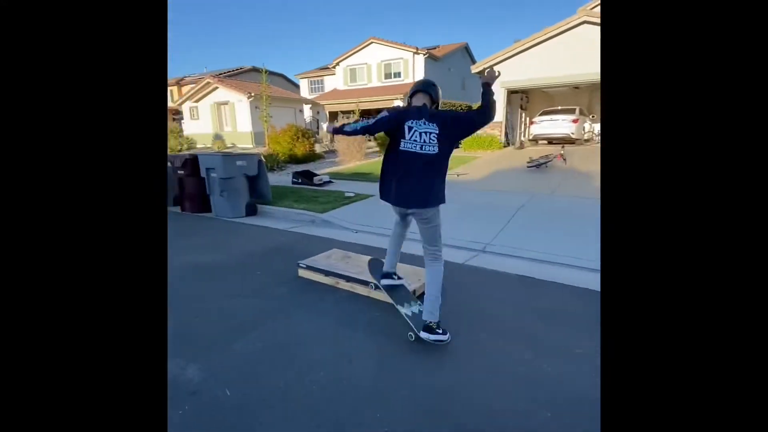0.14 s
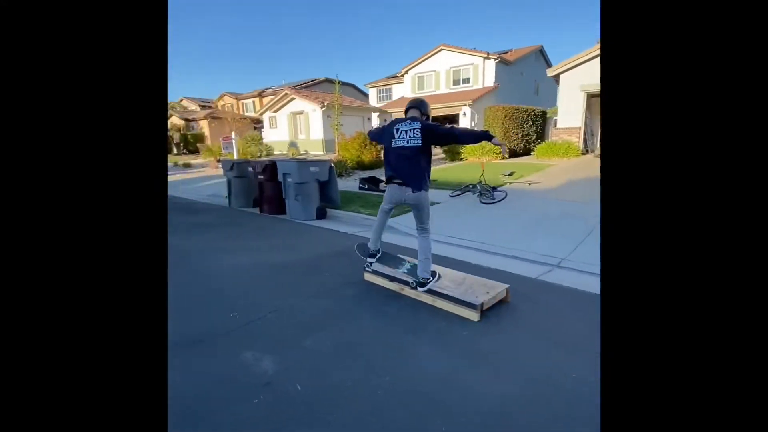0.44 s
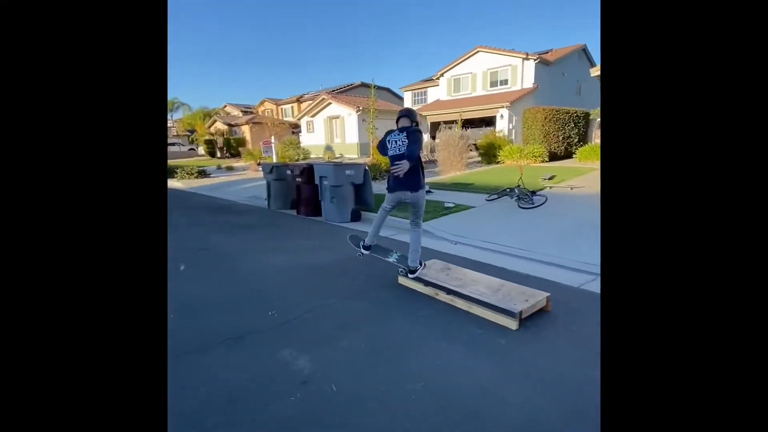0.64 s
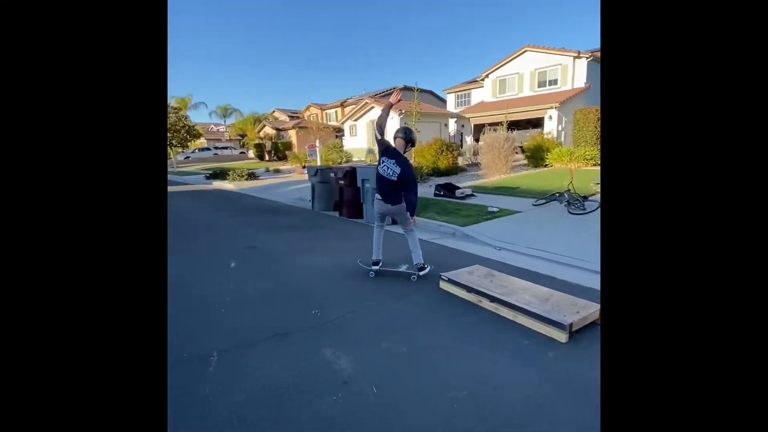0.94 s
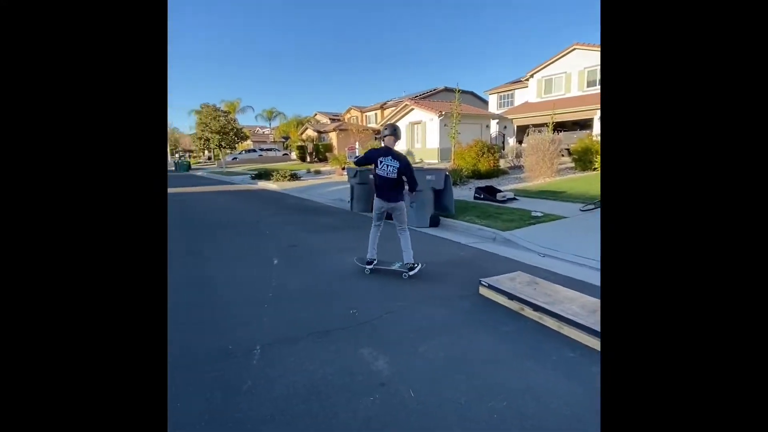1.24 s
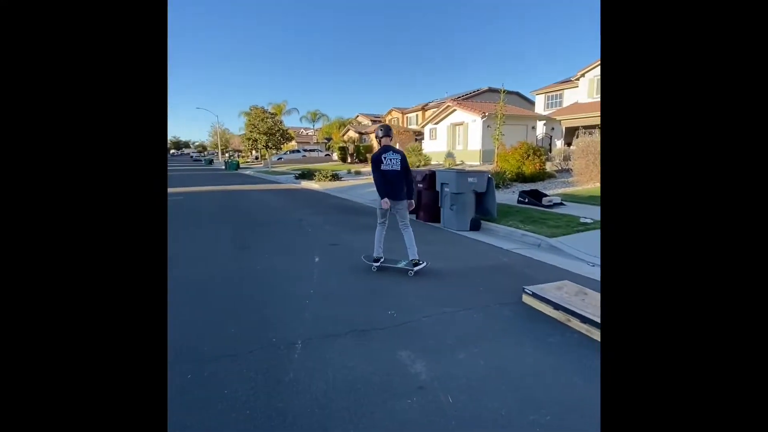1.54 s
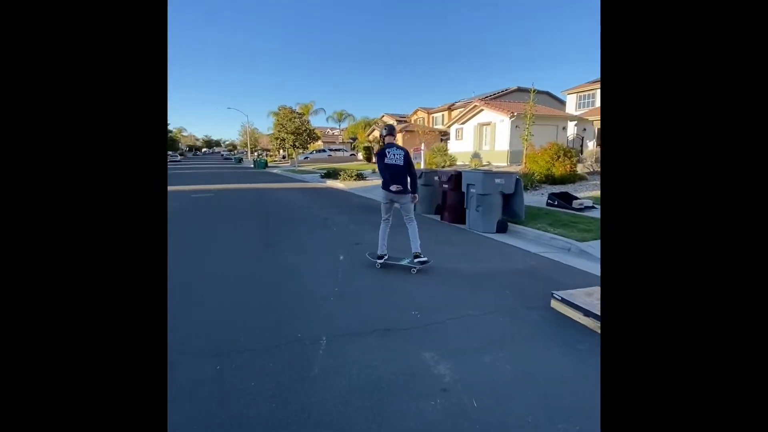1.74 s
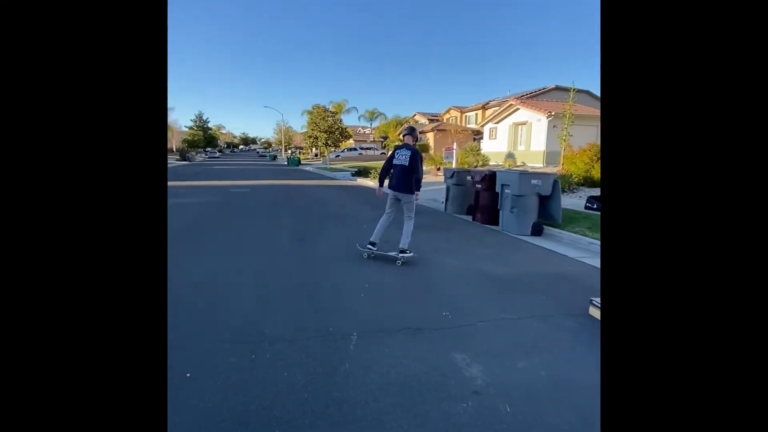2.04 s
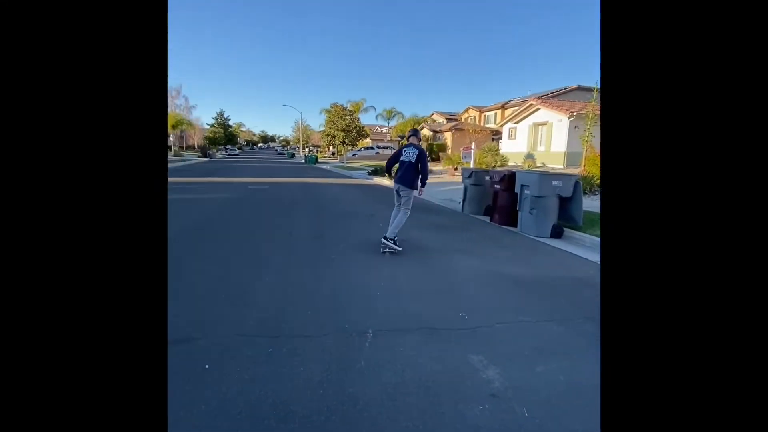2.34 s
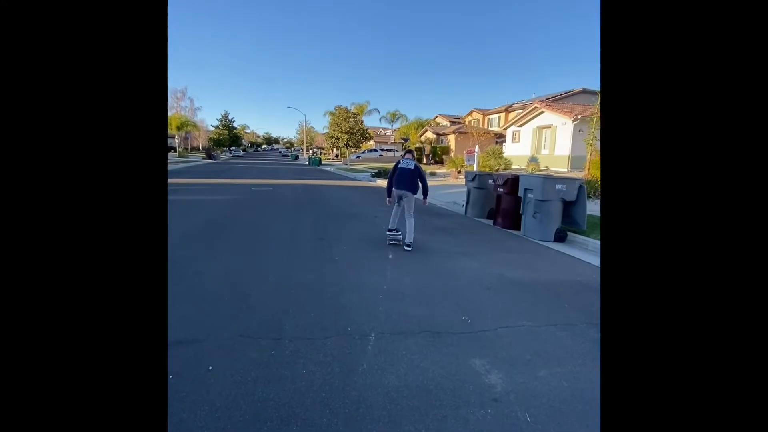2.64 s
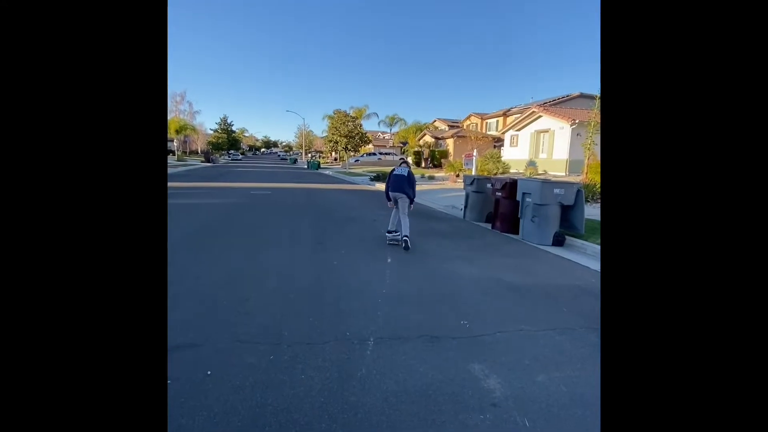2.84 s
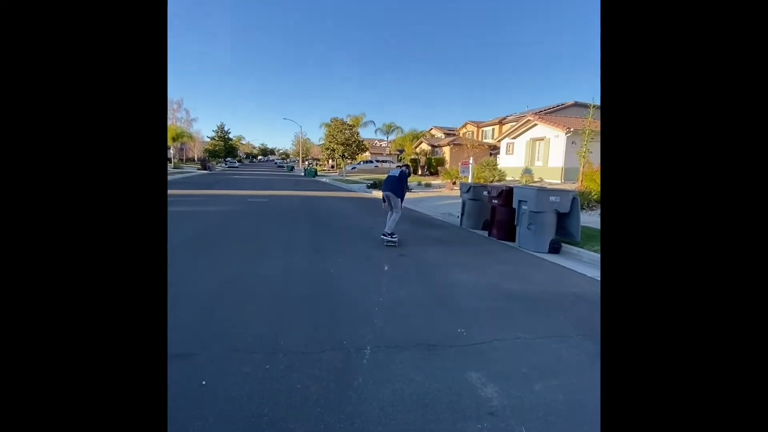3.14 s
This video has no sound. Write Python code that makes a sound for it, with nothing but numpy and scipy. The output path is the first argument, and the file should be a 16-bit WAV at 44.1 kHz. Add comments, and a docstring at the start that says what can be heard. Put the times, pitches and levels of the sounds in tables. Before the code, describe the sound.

Skateboard wheels rumble across hollow wood with sharp cracks, then roll along a gritty street.

```python
"""Skateboard over a wooden box

A skateboarder pops onto a low wooden box, rolls across it, clatters off and rides away down an
asphalt street. The wheels rumble, roar and crunch over grit; the deck cracks at each blow and the
hollow box booms. Houses return faint echoes; a small two-port microphone follows from behind."""
import sys
import numpy as np
from scipy import signal
from scipy.fft import rfft, irfft
from scipy.io import wavfile

SR = 44100
rng = np.random.default_rng(int(sys.argv[2]) if len(sys.argv) > 2 else 0)


def pcm_store(signal):
    """Save signal as 16-bit PCM."""
    levels = np.round(np.clip(np.atleast_2d(signal), -1, 1) * 32767)
    wavfile.write(sys.argv[1], SR, levels.astype(np.int16).T)


N = 145530
TIME, HZ = np.arange(N) / SR, np.fft.rfftfreq(N, 1 / SR)
ATTACK_S = 0.00046


def amp(db):
    """Decibels to gain."""
    return 10 ** (np.asarray(db) / 20)


def unit(x):
    """Scales to rms 1."""
    return x / np.sqrt(np.mean(x ** 2) + 1e-20)


def eq_curve(points):
    """Joins EQ points into a gain at every frequency."""
    f, db = np.transpose(points)
    return amp(np.interp(np.log(HZ + 1), np.log(f), db))


def colour(x, gain):
    """Minimum-phase EQ of the given shape; keeps the power of white noise."""
    log_gain = np.log(np.maximum(unit(gain), 1e-4))
    mirrored = np.concatenate([log_gain, log_gain[-2:0:-1]])
    response = np.exp(np.conj(signal.hilbert(mirrored))[:len(HZ)])
    impulse = irfft(response)[:4096]
    return irfft(rfft(x, 2 * N) * rfft(impulse, 2 * N))[..., :N]


def bands(points, bass_hz=552, treble_hz=2170, top_hz=7400):
    """Crossover: splits an EQ curve into bass, mids, treble and top octave."""
    low = 1 / (1 + (HZ / bass_hz) ** 8)
    high = 1 / (1 + (treble_hz / (HZ + 1)) ** 8)
    top = 1 / (1 + (top_hz / (HZ + 1)) ** 16)
    return eq_curve(points) * np.sqrt([low, (1 - low) * (1 - high), high * (1 - top), top])


def strike(start, rise_s, decay_s):
    """Envelope of one hit: the contact builds smoothly, then dies."""
    t = TIME - start
    attack = np.logaddexp(0, 2 - 2 * t / rise_s)
    return np.exp(-np.minimum(attack + np.maximum(t, 0) / decay_s, 20))


def ring(modes, t60_s):
    """Struck modes in random phase; the lowest dies in t60_s, higher ones sooner."""
    t = TIME[:SR // 3]
    hz, db = np.transpose(modes)[:, :, None]
    envelopes = amp(db - 60 * t / t60_s * np.sqrt(hz / hz[0]))
    waves = envelopes * np.sin(2 * np.pi * (hz * t + rng.random(hz.shape)))
    return waves.sum(0) / np.linalg.norm(amp(db)) * (1 - np.exp(-t / ATTACK_S))


def add(mix, s, sound):
    """Mixes a sound in at s seconds."""
    part = mix[max(round(s * SR), 0):][:len(sound)]
    part += sound[:len(part)]


# tone of the outdoor air: f/Hz, level/dB
AIR_EQ = [(20, -18), (55, 0), (115, 0), (200, -12), (600, -20), (2000, -28), (6000, -42), (16000, -54)]


def air(level_db=-50.5):
    """A bed of outdoor air: soft, bass-heavy noise."""
    return amp(level_db) * colour(rng.standard_normal((2, N)), eq_curve(AIR_EQ))


def street_echoes(x, near_t60_s=0.11, near_db=-11, far_t60_s=0.49, far_db=-31):
    """Adds quick scatter from ground and box, and a faint, darker tail from the houses."""
    t = TIME[:SR]
    near, far = rng.standard_normal((2, 2, SR))
    near = unit(near * amp(-60 * t / near_t60_s) * (t > .006))
    far = unit(signal.lfilter([1], [1, -.6], far) * amp(-60 * t / far_t60_s) * (t > .04))
    reverb = (amp(near_db) * near + amp(far_db) * far) / np.sqrt(SR)
    return x + signal.fftconvolve(x, reverb, axes=1)[:, :N]


# stereo image of the ports: f/Hz, left phase lead/rad, left over right/dB, likeness/0-1
PORT_IMAGE = [(40, -.1, 1, .66), (120, -.4, -5, .85), (260, -.2, -13, .87), (350, -.5, -17, .6),
              (450, -1.6, -15, .5), (530, -2.3, -10, .7), (680, -3.1, -2, .92), (980, -4.8, -6, .95),
              (1400, -5.5, -2, .95), (2100, -5.6, 1, .88), (2600, -5.7, -3, .5), (3600, -6.5, -1, .78),
              (4400, -6.8, -3, .55), (4800, -10, -2, .65), (5400, -12.2, 1, .74), (6200, -11.4, 1, .7),
              (6900, -9.6, 0, .88), (7800, -9.4, 0, .95), (8500, -8.8, -1, .75), (9800, -6.4, 0, .9),
              (11400, -6, 0, .85), (12700, -3.3, 0, .93), (14400, -3, 0, .9), (15700, 0, 0, .73)]


def microphone(x):
    """Two ports share one part of the sound, each with its own phase and level."""
    f, *columns = np.transpose(PORT_IMAGE)
    phase, balance_db, likeness = (np.interp(HZ, f, c) for c in columns)
    likeness, balance = np.clip(likeness, 0, .99), amp(balance_db)
    shared, separate = rfft(x)
    right = (likeness * shared + np.sqrt(1 - likeness ** 2) * separate) * np.exp(-1j * phase)
    return irfft(np.array([balance * shared, right]) * np.sqrt(2 / (1 + balance ** 2)))


# fader for the coarse asphalt: t/s, level/dB
CRUNCH_FADER = [(1.5, -66), (1.74, -59), (1.85, -49), (2.05, -51), (2.2, -69), (2.5, -68)]
# tone of its grains: f/Hz, level/dB
CRUNCH_EQ = [(400, -25), (700, 4), (1500, -8), (2300, -9), (3000, 3), (3700, -6), (5000, -22), (16000, -38)]


def crunch(grains_per_s=1200):
    """The wheels cross a coarse stretch of road: a dense run of hard grains."""
    grains = (rng.random(N) < grains_per_s / SR) * rng.standard_normal((2, N))
    fader = amp(np.interp(TIME, *np.transpose(CRUNCH_FADER)))
    return colour(unit(grains), eq_curve(CRUNCH_EQ)) * fader


# pebbles under the wheels: t/s, knock/dB, tick/dB
PEBBLE_CUES = [(0.092, -30, -30.5), (.133, -40, -35), (0.171, -39, -39), (0.265, -34, -35),
               (0.488, -32, -19), (0.624, -30, -22), (0.74, -49, -42), (.782, -43, -45), (0.831, -38, -40),
               (1.083, -31, -44), (1.128, -29, -46), (1.302, -46, -57), (1.392, -44, -43), (1.41, -38, -43),
               (1.4648, -33, -39), (1.5146, -32.5, -33), (1.619, -33, -30), (1.797, -27, -33),
               (1.891, -35, -31), (1.9968, -29, -37.5), (2.038, -26.5, -34), (2.2431, -35, -35),
               (2.3702, -29, -28), (2.4472, -32, -46), (2.4779, -29.5, -28), (2.694, -46, -52),
               (2.7405, -37, -51), (2.7915, -57, -50)]
# tone of a pebble: f/Hz, level/dB
PEBBLE_EQ = [(100, -46), (600, -19.5), (1000, 6.5), (1800, 7.5), (2700, -3.5), (4200, -11), (6000, -1),
             (10000, -7), (16000, -12)]


def pebbles(knock_decay_s=0.0028, tick_decay_s=0.0012):
    """Loose stones knock under the wheels and crack with a bright tick."""
    bass, mids, treble, top = bands(PEBBLE_EQ)
    knock, tick = np.zeros((2, N))
    t = TIME[:SR // 20]
    for s, knock_db, tick_db in PEBBLE_CUES:
        add(knock, s, amp(knock_db) * np.exp(-t / knock_decay_s))
        add(tick, s, amp(tick_db) * np.exp(-t / tick_decay_s))
    noise = rng.choice([-1., 1.], (2, N))
    return colour(knock * noise, np.hypot(bass, mids)) + colour(tick * noise, np.hypot(treble, top))


# modes of the box: f/Hz, level/dB
BOX_MODES = [(156, -0.5), (249, -0.5), (335, -15), (396, -5.5), (462, -1)]


def box_boom():
    """The hollow box answers a hit with a short, low boom."""
    return ring(BOX_MODES, t60_s=0.14)


# modes of deck and trucks: f/Hz, level/dB
DECK_MODES = [(855, -3.5), (975, -4.5), (1127, 7), (1247, -1), (1340, -11.5), (1477, -20), (1625, 1),
              (1765, 3.5), (2065, -8), (2320, 4), (3500, -6), (4750, -20), (5840, -14)]


def deck_ring():
    """Deck and trucks ring briefly when jolted."""
    return ring(DECK_MODES, t60_s=0.16)


# grit's share of the power: rumble, roar, hiss, fizz, each /0-1
BAND_GRIT = [.15, .25, .35, .65]
# judder depth: rumble/dB, roar/dB, hiss/dB, fizz/dB
BAND_JUDDER = [1.4, 3.4, 3.1, 3.3]


def rolling(faders, eq, judder_hz, grit_per_s=1500, grit_spread_db=5, deck_db=-14.5):
    """Wheels hit countless grains of the surface, judder over its bumps and shake the deck."""
    times, *band_levels = np.transpose(faders)
    judder = unit(irfft(rfft(rng.standard_normal(N)) * (HZ > 6) / (1 + (HZ / judder_hz) ** 2)))
    hits = rng.random(N) < grit_per_s / SR
    strength = amp(grit_spread_db * np.minimum(rng.exponential(1, N), 4))
    grit = unit(hits * strength * rng.choice([-1., 1.], (2, N)))
    layers = []
    for gain, db, share, judder_db in zip(bands(eq), band_levels, BAND_GRIT, BAND_JUDDER):
        texture = np.sqrt(share) * grit + np.sqrt(1 - share) * rng.standard_normal((2, N))
        flutter = unit(amp(judder_db * judder))
        layers.append(colour(texture, gain) * flutter * amp(np.interp(TIME, times, db)))
    roar = layers[1]
    deck = signal.fftconvolve(roar, deck_ring()[None], axes=1)[:, :N]
    return sum(layers) + amp(deck_db) * roar.std() * unit(deck)


# faders for wheels on asphalt: t/s, rumble/dB, roar/dB, hiss/dB, fizz/dB
ROAD_FADERS = [(0, -30.5, -18.5, -33.5, -36), (0.035, -43, -40.5, -49, -50), (0.11, -48.5, -43, -51.5, -52),
               (0.18, -54, -47, -58, -67), (0.22, -39, -49, -58, -62), (0.66, -60, -54, -54.5, -57),
               (0.7, -47, -38.5, -41, -42), (0.76, -46, -43, -60, -62.5), (0.97, -42.5, -43, -54, -54),
               (1.12, -51, -43.5, -55, -75), (1.28, -50, -51, -65, -88), (1.45, -50, -50.5, -66, -79),
               (1.49, -48.5, -41.5, -56, -60), (1.62, -48.5, -39, -52.5, -48),
               (1.72, -40.5, -42, -59.5, -56), (1.83, -37, -37, -53.5, -46), (2.02, -40.5, -40, -52, -49),
               (2.16, -48, -40.5, -55, -61), (2.27, -42, -36.5, -44.5, -45.5),
               (2.38, -49, -38.5, -44, -49.5), (2.49, -47, -38.5, -49.5, -53), (2.58, -51.5, -49, -58, -67),
               (2.87, -46, -47, -62, -75), (3.0, -39, -38.5, -49, -54), (3.08, -38.5, -41.5, -51, -62),
               (3.15, -36, -32.5, -44.5, -53), (3.25, -48, -47.5, -72, -83), (3.3, -44, -53, -58, -72)]
# tone of the asphalt: f/Hz, level/dB
ROAD_EQ = [(20, 0), (40, -45), (60, -5.5), (130, 0), (330, -3.5), (600, -11.5), (800, -2), (1200, -11),
           (1500, -10.5), (1950, -9.5), (2400, -21), (3300, -14.5), (4200, -20), (5200, -13), (6200, -17.5),
           (7500, -21.5), (10000, -31), (13000, -45), (16000, -39.5)]


def wheels_on_road():
    """Asphalt gives a gritty roll before and after the box."""
    return rolling(ROAD_FADERS, ROAD_EQ, judder_hz=44)


# faders for wheels on the box top: t/s, rumble/dB, roar/dB, hiss/dB, fizz/dB
BOX_TOP_FADERS = [(.19, -66, -70, -80, -80), (.22, -23, -25, -29, -48), (.31, -35, -39, -50.5, -61),
                  (.39, -28, -30, -41, -55.5), (.455, -28.5, -31, -38.5, -53),
                  (.48, -32.5, -24.5, -27, -33), (.535, -20, -36, -42, -49), (.595, -32.5, -43, -46, -55),
                  (.62, -31.5, -32, -35.5, -35), (.665, -30, -35, -33, -38), (.7, -66, -62, -70, -54)]
# tone of the box top: f/Hz, level/dB
BOX_TOP_EQ = [(30, -15.5), (90, -2), (170, 0.5), (400, 0), (600, -12), (800, -1), (1000, -4.5), (1350, -14),
              (1600, -6.5), (2400, -28.5), (4200, -37.5), (5400, -30.5), (8000, -53.5), (15000, -62)]


def wheels_on_box():
    """The wooden top gives a louder, darker roll from about 0.2 to 0.68 s."""
    return rolling(BOX_TOP_FADERS, BOX_TOP_EQ, judder_hz=60)


# low thuds of the wood: t/s, f/Hz, level/dB
THUD_CUES = [(0.201, 229, -9.5), (0.224, 163, -13), (.27, 140, -19), (0.379, 180, -21), (0.481, 280, -11.5),
             (0.496, 150, -13), (.53, 247, -19), (.627, 332, -18.5), (0.676, 320, -28)]


def thuds(rise_s=0.0019, decay_s=.014):
    """The rider's weight flexes deck and box for a few slow cycles."""
    wave = sum(amp(db) * strike(s, rise_s, decay_s) * np.exp(2j * np.pi * hz * (TIME - s))
               for s, hz, db in THUD_CUES)
    return np.array([wave.imag, wave.real])


# blows of the board: t/s, thump/dB, crack/dB, snap/dB, spit/dB, burst decay/s,
# knock f/Hz, knock/dB, deck ring/dB, box boom/dB
BLOW_CUES = [(0.1922, -48, -17.5, -20, -40, 0.0099, 1250, -36, -34, -53),
             (.2, -18.5, -12.5, -14.5, -19.5, 0.0069, 1010, -3.5, -13, -26),
             (0.221, -26, -20, -28, -48, 0.0065, 1400, -16, -28, -32),
             (0.472, -21, -26, -28, -33, 0.0081, 1530, -17, -36, -32),
             (.478, -19, -21, -30, -38, .006, 1520, -2, -33, -37),
             (.5025, -27, -9, -8, -25.5, 0.0036, 1775, -1.5, -22, -26),
             (0.506, -22, -21, -36, -42, .005, 993, -0.5, -18, -36),
             (0.5191, -25, -20.5, -26.5, -42, 0.0086, 2030, -7, -32, -24),
             (0.604, -26, -17.5, -17, -25.5, 0.0037, 3525, -15.5, -20, -40),
             (0.653, -32, -23, -19, -21.5, 0.0038, 1273, -8.5, -36, -42),
             (.6755, -16.5, -10.5, -16, -25, 0.0046, 1340, -5, -20, -50),
             (0.6941, -33, -13, -19.5, -27, 0.0029, 1406, -10.5, -40, -60),
             (2.078, -31, -20, -19.5, -31, 0.004, 1627, -8.5, -48, -80),
             (2.18, -26, -22.5, -29, -34, 0.0069, 795, -22, -42, -78)]
# tone of a blow's noise: f/Hz, level/dB
BLOW_EQ = [(30, -9), (90, -2), (170, -1.5), (300, 9), (560, 0), (720, 0.5), (980, 0), (1700, -9),
           (2600, -15), (4200, -25), (5800, -20), (7500, -29.5), (10000, -35.5), (15500, -50.5)]


def blows():
    """The board hits: thump, crack, snap, a spit of grit and a woody knock; deck and box ring on."""
    power, rings = np.zeros((4, N)), np.zeros(N)
    for s, thump_db, crack_db, snap_db, spit_db, decay_s, hz, knock_db, deck_db, box_db in BLOW_CUES:
        thump = amp(thump_db) * strike(s, rise_s=0.0015, decay_s=0.014)
        bursts = np.outer(amp([crack_db, snap_db, spit_db]), strike(s, ATTACK_S, decay_s))
        power += np.vstack([thump, bursts]) ** 2
        knock = amp(knock_db) * strike(s, rise_s=0.0006, decay_s=0.0033)
        rings += knock * np.sin(2 * np.pi * hz * (TIME - s))
        add(rings, s, amp(deck_db) * deck_ring() + amp(box_db) * box_boom())
    noise = sum(colour(envelope * rng.standard_normal((2, N)), gain)
                for envelope, gain in zip(np.sqrt(power), bands(BLOW_EQ)))
    return noise + np.array([rings, signal.hilbert(rings).imag])  # channels a quarter cycle apart


def scene():
    """The board on road and box, echoing in the street over a bed of air."""
    board = wheels_on_road() + wheels_on_box() + blows() + thuds() + pebbles() + crunch()
    return microphone(street_echoes(board) + air())


def record(dry):
    """Soft clipping rounds the peaks; a steep low-pass trims the very top."""
    lowpass = signal.firwin(511, cutoff=15950, window=("kaiser", 9), fs=SR)
    return signal.oaconvolve(np.tanh(dry), lowpass[None], "same")


dry = scene()
out = record(dry)
pcm_store(out)
```